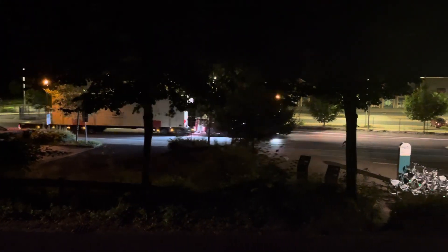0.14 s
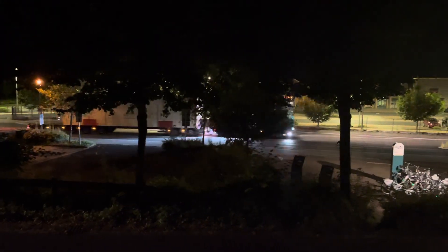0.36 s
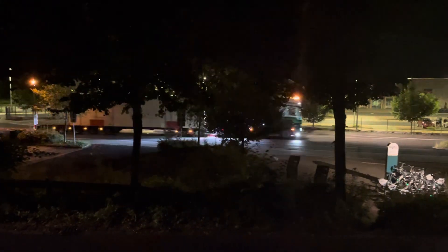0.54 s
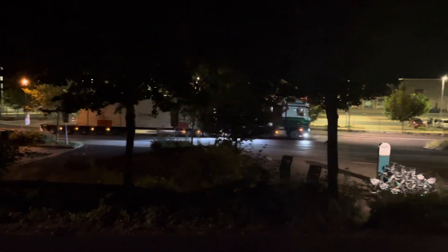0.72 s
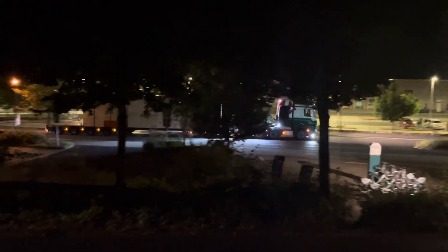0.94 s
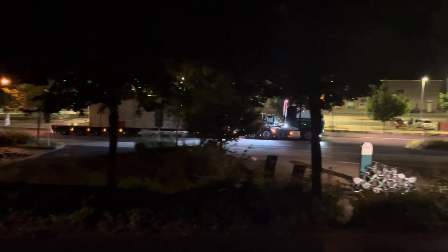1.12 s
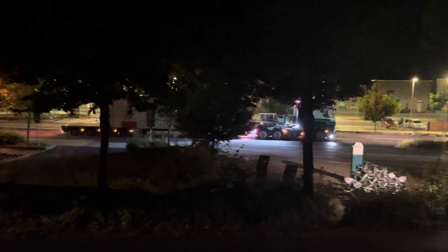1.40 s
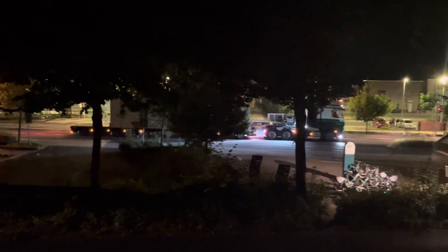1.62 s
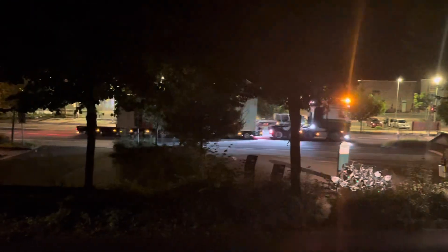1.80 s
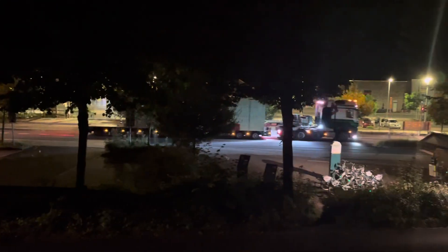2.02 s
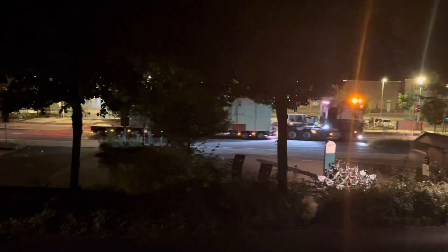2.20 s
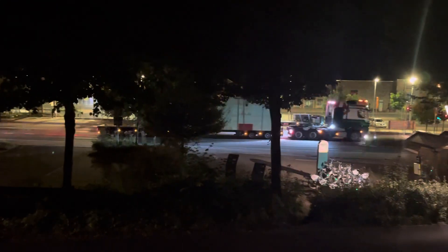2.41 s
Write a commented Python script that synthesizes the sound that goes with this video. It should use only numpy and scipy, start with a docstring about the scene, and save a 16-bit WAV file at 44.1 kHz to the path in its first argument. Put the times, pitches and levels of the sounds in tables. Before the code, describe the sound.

A big truck's deep engine rumble passes at a distance, slowing slightly, with thin squeaking brakes

```python
"""Heavy truck, slow night pass

A heavy articulated truck rolls past two microphones some tens of metres away, losing a little speed.
Exhaust, fan and drive are wavering harmonics on sinking pitches; the gear whines far above them.
Shaped noise gives the diesel clatter and road rumble, narrow noise the ringing of the tractor.
A short low sine is the trailer's one thump. From about one second the dragging brakes squeak very high,
one of them once per wheel turn, among a wandering whistle and faint chirps; engine covers rattle briefly."""
import sys
import numpy as np
from scipy import signal
from scipy.fft import rfft, irfft
from scipy.io import wavfile

SR = 44100
rng = np.random.default_rng(int(sys.argv[2]) if len(sys.argv) > 2 else 0)


def to_wav(s):
    """Save 16-bit WAV."""
    ch = np.atleast_2d(s).T  # columns
    pcm = np.round(np.clip(ch, -1, 1) * 32767)  # PCM
    wavfile.write(sys.argv[1], SR, pcm.astype(np.int16))


N = 112455
LEFT_RIGHT = np.array([[1], [-1]])  # signs that set the two microphones apart


def undb(db):
    """Decibels to gain."""
    return 10 ** (np.asarray(db) / 20)


def seconds():
    """Time of every sample."""
    return np.arange(N) / SR


def curve(rows, axis=1):
    """One column of a table, joined by straight lines in time."""
    rows = np.array(rows, float)
    return np.interp(seconds(), rows[:, 0], rows[:, axis])


def over_bins(rows, axis=1):
    """One column of a table, joined on a log-frequency axis."""
    rows = np.array(rows, float)
    bins_hz = np.arange(N // 2 + 1) * SR / N
    return np.interp(np.log(bins_hz + 1e-9), np.log(rows[:, 0]), rows[:, axis])


def walk(rate):
    """Smooth chance with spread 1 that moves about rate times a second."""
    bins_hz = np.arange(N // 2 + 1) * SR / N
    smooth = irfft(rfft(rng.standard_normal(N)) * np.exp(-.5 * (bins_hz / rate) ** 2), N)
    return smooth / smooth.std()


def narrow(width):
    """The wandering strength and phase of a narrow band of noise, width in Hz."""
    return (walk(width) + 1j * walk(width)) / np.sqrt(2)


def spin(hz):
    """A rotating phasor whose pitch may move."""
    return np.exp(2j * np.pi * np.cumsum(hz) / SR)


def partial(hz, db, rough, apart):
    """A line on a moving pitch; scattered paths make it waver, a little differently in each channel."""
    def scatter():
        return (walk(14.4) + 1j * walk(10.8)) / np.sqrt(2)

    paths = 1 + rough * scatter() + apart * scatter() * LEFT_RIGHT
    tone = np.exp(2j * np.pi * (np.cumsum(hz) / SR + rng.random()))
    even_power = np.sqrt(2 / (1 + rough ** 2 + apart ** 2))
    return even_power * undb(db) * (paths * tone).real


# How sound reaches the two microphones: pitch_hz, coherence (0-1), left_lead_rad
MICROPHONES = [(110, 0.98, 0), (260, 0.79, 0), (545, 0.6, 0.51), (1400, 0.49, -0.56), (2750, 0.72, 0),
               (6350, 0.46, -0.6), (7300, .6, -2), (7680, 1, -3), (8900, 1, -3.5), (10840, 0.93, -6),
               (12400, 1, -7), (14000, 0.8, -8.5)]


def diffuse(colour):
    """Stereo noise of a given colour and unit level, partly alike at the two microphones."""
    alike = np.clip(over_bins(MICROPHONES), 0, 1)
    gain = undb(over_bins(colour))
    mid = rfft(rng.standard_normal(N)) * gain * np.sqrt(1 + alike)
    side = rfft(rng.standard_normal(N)) * gain * np.sqrt(1 - alike)
    turn = np.exp(.5j * over_bins(MICROPHONES, axis=2))
    stereo = irfft(np.array([(mid + side) * turn, (mid - side) / turn]), N)
    return stereo / stereo.std()


def scattered(count, span, band, db, length, glide):
    """Brief, wavering rings at random times, pitches and levels (within 5 dB either way)."""
    t = seconds()
    out, mics, waver = np.zeros((2, N)), np.array(MICROPHONES), narrow(60)
    for when, pitch, size, slope in rng.random((count, 4)):
        age = t - np.interp(when, (0, 1), span)
        hz = np.interp(pitch, (0, 1), band)
        near = np.abs(age) < .1  # the ring is negligible beyond this
        a = age[near]
        lead = np.interp(hz, mics[:, 0], mics[:, 2])
        glided = hz * a + (slope - .5) * glide * a ** 2  # up or down, by at most the given glide
        phase = 2 * np.pi * glided + .5 * lead * LEFT_RIGHT
        path = 1 + .5 * np.roll(waver, int(pitch * N))[near]
        ring = np.exp(-(a / length) ** 2) * (path * np.exp(1j * phase)).real
        out[:, near] += undb(db + 10 * (size - .5)) * ring
    return out


# Engine speed as the rate of firings: start_s, pitch_hz
FIRING_RATE = [(0, 54.94), (.55, 55.86), (1.2, 53.5), (1.45, 52.18), (1.75, 50.92), (2.15, 49.95),
               (2.55, 48.57)]
# Exhaust fundamental: start_s, level_db
EXHAUST_BOOM = [(0, -35), (.26, -29.5), (.42, -58), (.9, -33.5), (1.34, -36), (1.43, -26.5), (1.73, -25),
                (1.87, -37), (2.0, -28.5), (2.16, -26), (2.26, -40), (2.55, -42)]
# Exhaust overtones: multiple of the firing rate, first_level_db, last_level_db
EXHAUST_OVERTONES = [(2, -32, -33.5), (3, -52.5, -34), (4, -31, -39.5), (7, -41, -51), (9, -41, -56)]


def exhaust(firing):
    """The firing rate booms out of the pipe with uneven overtones."""
    out = partial(firing, curve(EXHAUST_BOOM), rough=0.24, apart=0.066)
    for k, first_db, last_db in EXHAUST_OVERTONES:
        level_db = np.linspace(first_db, last_db, N)
        out = out + partial(round(k) * firing, level_db, rough=1.0, apart=0.079)
    return out


# Fan and drive: start_s, pitch_hz, then level_db of multiples 1, 2 and 4 (the last before its swell)
DRIVE_DRONE = [(0, 101.7, -35, -30.5, -37), (.45, 101.6, -36, -33, -35), (.75, 100.5, -30, -33.5, -35.5),
               (1.1, 98.9, -39, -30, -35.5), (1.56, 96.56, -33.5, -37.5, -51.5),
               (1.69, 98.06, -27, -29, -47), (1.8, 96.16, -34.5, -31, -59), (1.93, 95.17, -22.5, -39, -46),
               (2.06, 93.83, -37, -39, -52), (2.21, 92.65, -28.5, -38, -49), (2.55, 91.9, -36, -44, -55)]
# Further drone harmonics: multiple, level_db
DRIVE_UPPER = [(3, -45.5), (6, -45)]
# Gear whine: start_s, level_db
GEAR_WHINE = [(0, -48), (.28, -48), (.5, -39), (.85, -47), (1.4, -50.5), (2.55, -60)]
GEAR_MULTIPLE, GEAR_WAVER = 13.03, .008  # whine over drone pitch; spread of its pitch as a fraction
GEAR_OCTAVE_DB = -16  # octave of the whine, relative to the whine
SWELL_RATE_HZ, SWELL_DB = 6.7, 4.2


def drive():
    """Fan and drive drone in octaves; a gear whines far above them."""
    hz = curve(DRIVE_DRONE)
    swell = SWELL_DB * np.cos(2 * np.pi * SWELL_RATE_HZ * seconds())  # the upper octave beats
    out = partial(hz, curve(DRIVE_DRONE, axis=2), rough=0.14, apart=0.037)
    out = out + partial(2 * hz, curve(DRIVE_DRONE, axis=3), rough=0.52, apart=0.14)
    out = out + partial(4 * hz, curve(DRIVE_DRONE, axis=4) + swell, rough=0.49, apart=0.34)
    for k, db in DRIVE_UPPER:
        out = out + partial(round(k) * hz, db, rough=0.93, apart=0.37)
    gear_hz = GEAR_MULTIPLE * hz * (1 + GEAR_WAVER * walk(19.5))
    gear_db = curve(GEAR_WHINE)
    out = out + partial(2 * gear_hz, gear_db + GEAR_OCTAVE_DB, rough=0.74, apart=0.35)
    return out + partial(gear_hz, gear_db, rough=0.48, apart=0.24)


# Colour of diesel clatter and air: pitch_hz, relative level_db per Hz
CLATTER_COLOUR = [(20, -27), (500, -7.5), (1100, -2), (2000, 1), (2800, -6), (4000, -6.5), (5500, -16),
                  (7000, -15.5), (10000, -17), (12000, -19.5), (13500, -42), (16000, -48)]
# Its loudness before pulsing and wander: start_s, level_db
CLATTER_LOUDNESS = [(0, -44.5), (.7, -43.5), (1.15, -45), (1.4, -43.5), (1.6, -41.5), (2.1, -43),
                    (2.55, -44.5)]
CLATTER_DEPTH = .14  # mean depth of the pulsing


def clatter(firing):
    """Combustion noise pulses with each firing, by an uneven depth."""
    beat = np.cos(2 * np.pi * np.cumsum(firing) / SR)
    pulse = 1 + CLATTER_DEPTH * beat * (1 + 0.68 * walk(34))
    return diffuse(CLATTER_COLOUR) * pulse * undb(curve(CLATTER_LOUDNESS) + 0.6 * walk(25))


# Colour of tyre and body rumble: pitch_hz, relative level_db per Hz
RUMBLE_COLOUR = [(20, -30), (34, -27), (50, -7), (75, 0.5), (110, 0), (145, -2), (210, -1.5), (275, -6.5),
                 (450, -9), (620, -8.5), (800, -12.5), (1350, -15), (1650, -25), (2600, -28), (5000, -39.5),
                 (16000, -66)]
# Its loudness before a slight wander: start_s, level_db
RUMBLE_LOUDNESS = [(0, -27), (.5, -28.5), (1.0, -29), (1.25, -27.5), (1.9, -28.5), (2.3, -29.5),
                   (2.55, -30.5)]
# Tread hum, sinking as the truck slows: start_s, pitch_hz, level_db
TREAD_HUM = [(1.0, 198.6, -52), (1.5, 184, -34), (1.68, 179.9, -37), (1.85, 173.9, -29.5),
             (2.05, 169.9, -35.5), (2.3, 167, -34.5), (2.55, 160.3, -34.5)]


def tyres():
    """Tyres and trailer body rumble over the road, and the tread hums."""
    hum = partial(curve(TREAD_HUM), curve(TREAD_HUM, axis=2), rough=0.27, apart=.1)
    return hum + diffuse(RUMBLE_COLOUR) * undb(curve(RUMBLE_LOUDNESS) + 0.7 * walk(4.8))


# Ringing of engine block, gearbox and body: pitch_hz, width_hz, level_db, loudest_s, length_s
# (level before the added channel difference)
BLOCK_RINGS = [(1508, 72.5, -49.5, 1.65, 0.67), (1948, 153, -51.5, 1.9, 1), (3510, 60, -59.5, 2.03, 1),
               (2386, 220, -58, 0.71, 0.62), (1149, 700, -42.5, 2.09, 0.16)]


def block():
    """Resonances of the tractor, as narrow noise, swell and fade as it passes behind the trees."""
    t = seconds()

    def ring(hz, width):
        return np.sqrt(2) * (narrow(width / 2) * np.exp(2j * np.pi * hz * t)).real

    out = 0
    for hz, width, db, at, length in BLOCK_RINGS:
        apart = .4 * min(hz / 700, 1)  # high rings differ more between the channels
        swell = undb(db) * np.exp(-2 * ((t - at) / length) ** 2)
        out = out + swell * (ring(hz, width) + apart * ring(hz, width) * LEFT_RIGHT)
    return out


BRAKE_ON_S, BRAKE_RISE_S, BRAKE_FLUTTER_DB = .95, 0.34, 3  # flutter is the spread of a random walk


def dragging():
    """How far the pads have come on, 0 to 1."""
    return np.clip((seconds() - BRAKE_ON_S) / BRAKE_RISE_S, 0, 1)


# Brake modes: pitch_hz (before bend and wander), width_hz, left_lead_rad, rubbing level_db (before flutter)
BRAKE_MODES = [(8680, 170, 2.7, -68), (11120, 70, .1, -68), (12800, 190, 1.3, -68), (4770, 50, 0, -70)]
# Squeaks: centre_s, length_s, mode (row of the brake modes, rounded), level_db (before stutter and flutter)
BRAKE_SQUEAKS = [(1.03, 0.024, 0, -41.5), (1.08, 0.037, 0, -45), (1.38, 0.076, 0.5, -52),
                 (1.77, 0.11, 0, -50), (2.17, .14, 0, -55.5), (2.532, 0.058, 0.5, -55),
                 (1.254, 0.035, 1, -49.5), (1.394, 0.05, 1, -50.5), (1.511, .03, 1, -47),
                 (1.575, 0.048, 1, -44), (1.802, .03, 1.5, -54), (1.98, 0.039, 1, -54),
                 (2.2, 0.018, 1, -46.5), (2.453, 0.042, 1, -51.5), (1.61, .06, 2, -53),
                 (1.819, .025, 3, -52), (1.892, 0.056, 2, -49), (1.951, 0.198, 3, -60),
                 (2.235, .025, 3, -49)]
SQUEAK_BEND_HZ = 50  # lift as the pad bites, for the second mode; the others in proportion to pitch


def brakes():
    """Each mode sings faintly under the dragging pad and flares into stuttering squeaks that bend in pitch."""
    t = seconds()
    drag = dragging()
    out = 0
    for k, (hz, width, lead, rub_db) in enumerate(BRAKE_MODES):
        flare, biting = 0, 0
        for at, length, mode, db in BRAKE_SQUEAKS:
            if round(mode) == k:
                bite = np.exp(-2 * ((t - at) / length) ** 2)
                flare = flare + undb(db) * bite
                biting = biting + bite
        bend = SQUEAK_BEND_HZ * (biting - 1) * hz / BRAKE_MODES[1][0]
        sing = flare * (0.73 + 0.56 * narrow(width))
        rub = drag * undb(rub_db) * narrow(width)
        flutter = undb(BRAKE_FLUTTER_DB * walk(40))
        voice = (sing + rub) * flutter * spin(hz + bend + 0.45 * width * walk(14))
        out = out + np.sqrt(2) * (voice * np.exp(.5j * lead * LEFT_RIGHT)).real
    return out


# The highest brake whistle wanders in pitch: start_s, pitch_hz, level_db
BRAKE_WHISTLE = [(1.0, 14800, -72.5), (1.25, 14600, -50), (1.33, 15450, -55), (1.5, 15500, -60),
                 (1.66, 14600, -60), (1.87, 14950, -47), (2.02, 14340, -58), (2.22, 14780, -54),
                 (2.33, 14650, -50), (2.41, 14500, -66)]
WHISTLE_LEAD_RAD, WHISTLE_WIDTH_HZ = 3.1, 90  # lead of the left channel
SIZZLE_HZ, SIZZLE_WIDTH_HZ, SIZZLE_DB = 14400, 550, -64  # level before flutter


def whistle():
    """A thin, splintered brake whistle at the top of hearing, in the sizzle of the pads."""
    sing = undb(curve(BRAKE_WHISTLE, axis=2)) * narrow(WHISTLE_WIDTH_HZ) * spin(curve(BRAKE_WHISTLE))
    sizzle_gain = dragging() * undb(SIZZLE_DB + BRAKE_FLUTTER_DB * walk(20))
    sizzle = sizzle_gain * narrow(SIZZLE_WIDTH_HZ) * np.exp(2j * np.pi * SIZZLE_HZ * seconds())
    return np.sqrt(2) * ((sing + sizzle) * np.exp(.5j * WHISTLE_LEAD_RAD * LEFT_RIGHT)).real


THUMP_S, THUMP_LENGTH_S, THUMP_HZ, THUMP_DB = 1.131, 0.02, 103.8, -15


def thump():
    """The hollow trailer booms briefly over a bump: a low sine under a bell-shaped envelope."""
    age = seconds() - THUMP_S
    envelope = np.exp(-(age / THUMP_LENGTH_S) ** 2)
    return undb(THUMP_DB) * envelope * np.sin(2 * np.pi * THUMP_HZ * age)


def chirps():
    """The pads also let out faint, overlapping chirps that glide in pitch (s, Hz, dB, s, Hz per s)."""
    return scattered(count=70, span=(1.18, 2.3), band=(11000, 13900), db=-59, length=0.019, glide=6200)


def rattle():
    """Engine covers ring roughly while the tractor is clear of the trees (s, Hz, dB, s)."""
    return scattered(count=50, span=(1.28, 1.85), band=(804, 2050), db=-46.5, length=.018, glide=0)


def scene():
    """The whole truck."""
    firing = curve(FIRING_RATE)
    engine = exhaust(firing) + drive() + clatter(firing) + block()
    road = tyres() + thump()
    pads = brakes() + whistle() + chirps()
    return engine + road + pads + rattle()


def record(dry):
    """The recorder cuts the top steeply above 15600 Hz."""
    top_cut = signal.ellip(8, .2, 70, 15600, fs=SR, output="sos")
    return signal.sosfilt(top_cut, dry)


dry = scene()
out = record(dry)
to_wav(out)
```